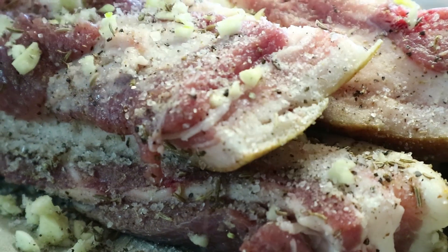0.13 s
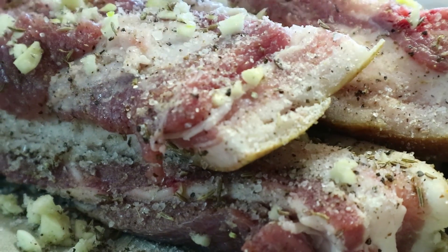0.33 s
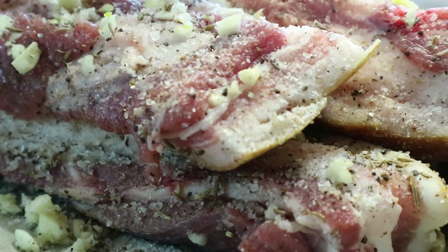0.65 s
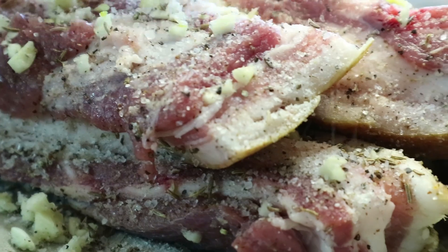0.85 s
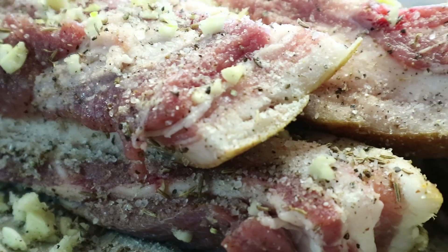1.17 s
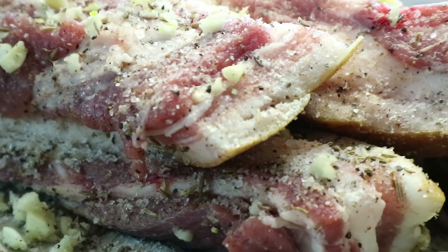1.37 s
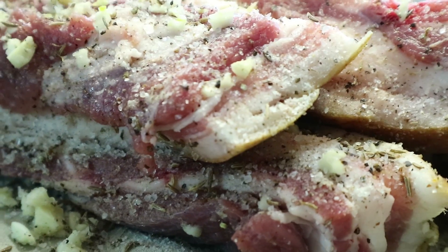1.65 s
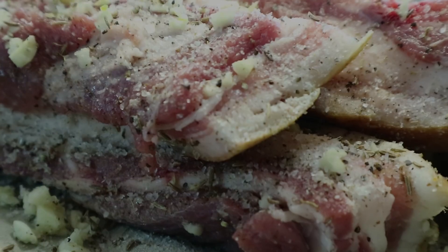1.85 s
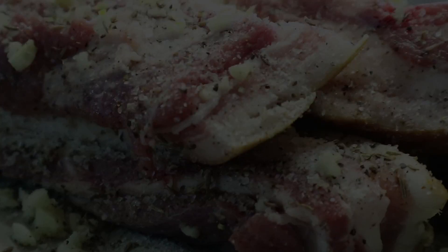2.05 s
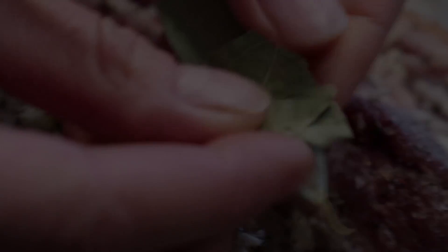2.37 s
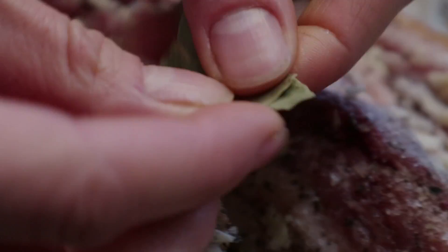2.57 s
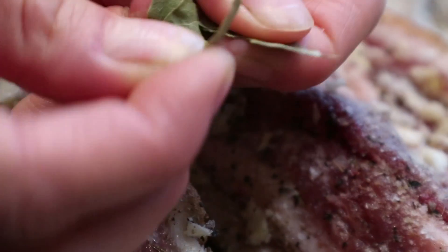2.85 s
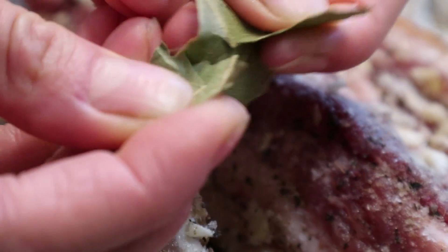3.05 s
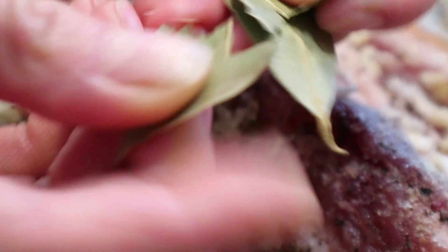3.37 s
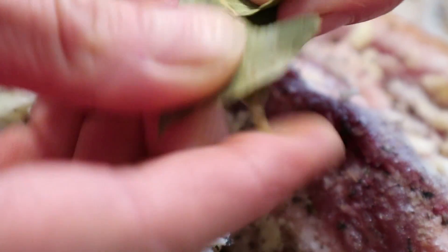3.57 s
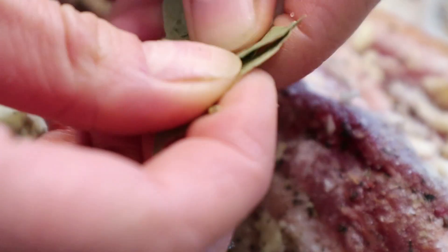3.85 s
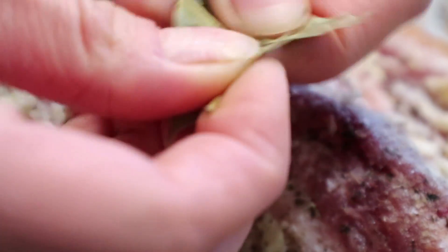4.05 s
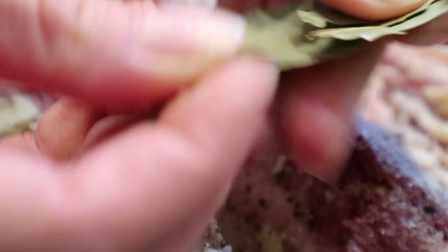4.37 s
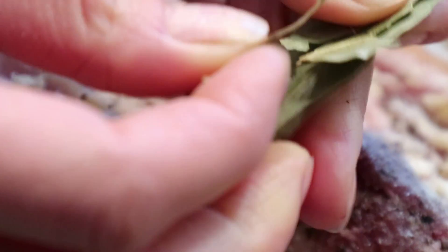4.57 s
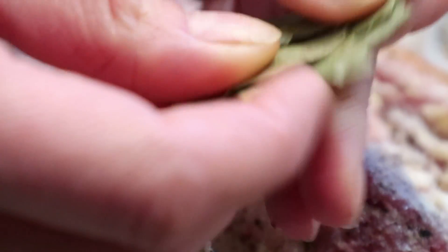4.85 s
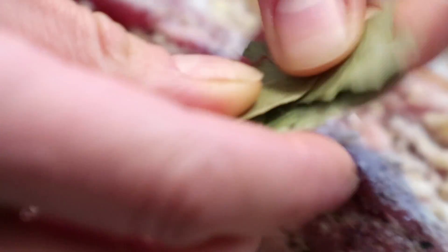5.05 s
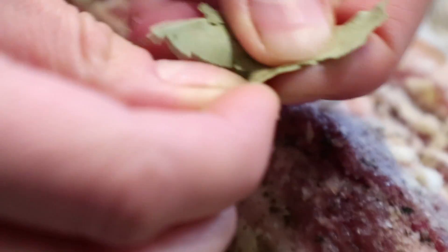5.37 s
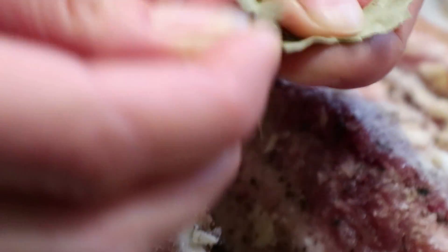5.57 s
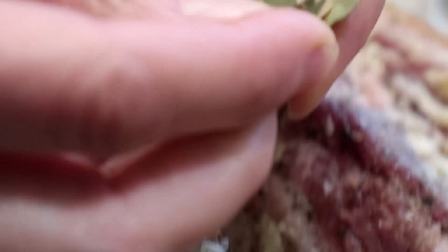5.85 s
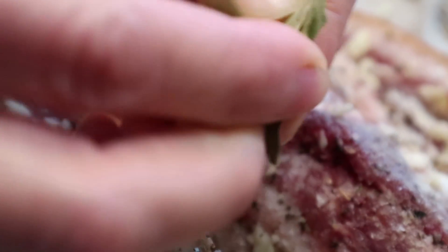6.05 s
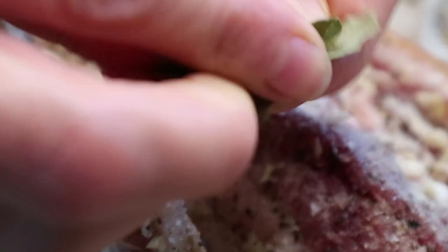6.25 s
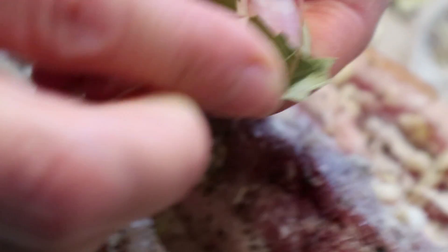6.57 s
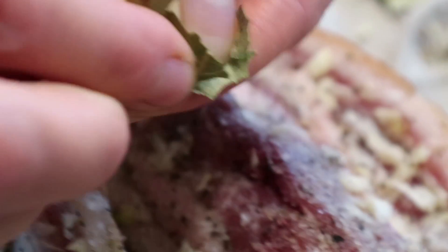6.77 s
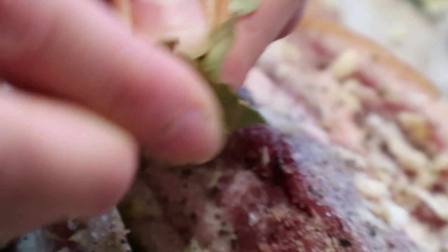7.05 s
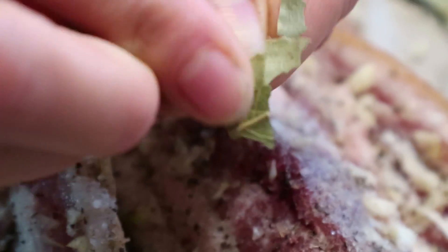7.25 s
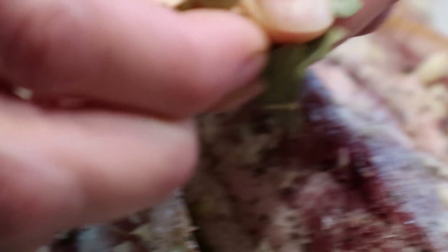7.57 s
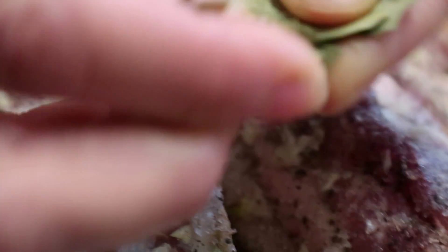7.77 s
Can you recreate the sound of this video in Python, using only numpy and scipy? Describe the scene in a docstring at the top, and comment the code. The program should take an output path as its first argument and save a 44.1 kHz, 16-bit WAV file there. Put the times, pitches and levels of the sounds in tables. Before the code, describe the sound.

A quiet kitchen with soft low room tone. For the first second and a half, faint sandy strokes of seasoning being rubbed or sprinkled. Around two seconds dried leaves begin to rustle and break close to a stereo microphone: sharp woody snaps, brittle crackle and scrapes in irregular clusters, with small gaps, growing denser after five seconds, with few dull finger bumps and a very short room reflection.

```python
"""Dry bay leaves tear close to a stereo microphone in a quiet kitchen: each brittle snap is a noise burst plus a
decaying tone, over a bed of fine crackle made of thousands of tiny ringing grains and noise.
Soft strokes of shaped hiss are fingers rubbing seasoning at first, then one airy rustle among the snaps; skin
rubs are wavering tones and the few dull bumps are short low tones. A brief room answer follows the leaves,
over a wide, low room tone of noise."""
import sys
import numpy as np
from scipy import signal
from scipy.fft import rfft, irfft, next_fast_len
from scipy.io import wavfile
from scipy.ndimage import uniform_filter1d, minimum_filter1d, map_coordinates

SR = 44100
rng = np.random.default_rng(int(sys.argv[2]) if len(sys.argv) > 2 else 0)


def bounce(signal):
    """Save signal as a 16-bit WAV file at the path given by the first command-line argument."""
    frames = np.transpose(np.atleast_2d(signal))
    limited = np.clip(frames, -1, 1)
    pcm = np.round(limited * 32767).astype(np.int16)
    wavfile.write(sys.argv[1], SR, pcm)


N = 349272

# Room tone common to both channels, then opposed between them: frequency_hz, density_db (per Hz, relative)
TONE_MID = [(20, -26), (290, -6), (800, -8), (3500, -14.5), (11000, -32.5), (14000, -60)]
TONE_SIDE = [(25, -87), (117, -7.5), (380, -4.5), (1560, -15), (11000, -38), (14000, -78)]
# Bass stirred by the hands moving close: time_s, level_db, deepest_rumble_db
BUSY = [(2.0, -74.5, -81.5), (4.6, -64, -82), (6.2, -67.5, -74), (6.8, -60.5, -65), (7.92, -62, -72.5)]
# Decay of the kitchen's answer: frequency_hz, t60_s
KITCHEN = [(300, 0.29), (2000, 0.2), (10000, 0.15)]
# Dull bumps of the hands: start_s, opposed_level_db, pitch_hz, common_share (ratio to the opposed part)
BUMPS = [(2.5014, -35, 300, 1), (4.7503, -32.5, 230, 0.37), (4.779, -21.5, 244, 0.31),
         (5.162, -33.5, 300, 0.79), (6.8273, -32, 190, 0.25), (6.8724, -30.5, 260, 0.25),
         (7.2218, -24, 310, 0.44)]
# Soft hissing strokes, rubbed seasoning and last an airy rustle: start_s, length_s, hiss_db (before the sag)
STROKES = [(0.0, 0.19, -68.5), (0.199, 0.088, -63.5), (0.362, 0.4, -62.5), (0.91, 0.24, -63.5),
           (1.131, 0.088, -60), (1.276, 0.35, -63), (4.385, 0.042, -55)]
# Spectrum of the strokes' hiss: frequency_hz, density_db (per Hz, relative)
GRIT = [(700, -22), (2000, 0), (3000, -5), (6200, -2.5), (11000, -11.5), (16000, -31)]
# Soft rubs of skin on leaf: start_s, length_s, middle_pitch_hz, level_db
RUBS = [(7.138, 0.04, 1145, -58), (7.642, 0.036, 1130, -52), (7.031, 0.069, 1390, -53),
        (7.336, 0.062, 1130, -52), (7.376, 0.038, 280, -50), (7.431, 0.026, 1164, -44.5)]
# Scrapes of leaf on leaf, swelling until they slip: peak_s, swell_s, level_below_5khz_db, treble_db
SCRAPES = [(1.992, 0.068, -48.5, -57.5), (2.065, 0.051, -44.5, -48), (2.706, 0.097, -37, -50.5),
           (2.856, 0.074, -54, -31.5), (3.15, 0.19, -41, -47), (3.717, 0.035, -45, -66),
           (3.937, 0.12, -45.5, -69), (4.284, 0.079, -36.5, -54), (5.10, 0.021, -46, -50.5),
           (5.3, 0.017, -43, -40), (5.691, 0.028, -42, -44), (6.123, 0.15, -46.5, -38),
           (6.61, 0.049, -49, -62), (6.849, 0.47, -47, -42.5), (7.322, 0.059, -52, -42.5)]
# Rising and falling rustle under the snaps: time_s, level_below_5khz_db, treble_db
RUSTLE = [(2.0, -60, -86), (2.4, -51.5, -61), (2.75, -56, -80), (3.1, -68.5, -69), (3.36, -62, -81),
          (3.6, -70, -71), (3.8, -49, -61.5), (4.2, -62.5, -83), (4.55, -61, -108), (4.85, -59, -63.5),
          (5.15, -49.5, -74), (5.335, -51, -66), (5.44, -48, -53), (5.87, -50.5, -55.5), (6.19, -59, -59),
          (6.5, -51, -51), (6.95, -57, -68), (7.2, -50, -45.5), (7.36, -60, -85), (7.55, -55, -47.5),
          (7.69, -61, -65.5), (7.92, -47.5, -50)]
# Spectrum of the leaf rustle: frequency_hz, density_db (per Hz, relative)
LEAF = [(300, -3.5), (1200, -2), (2100, 0.5), (5000, -7.5), (12000, -23.5), (16500, -39)]
# Snaps of the leaf blade, plus one low knock of the hands at 2.503 s built the same way: start_s,
# flap_pitch_hz, flap_db, crack_db (levels before the filters)
SNAPS = [(2.111, 3120, -27, -32), (2.1183, 1970, -22.5, -29), (2.1395, 1460, -16.5, -23),
         (2.197, 780, -18, -37), (2.265, 1480, -26.5, -33), (2.3276, 1890, -21.5, -27),
         (2.503, 656, -9, -40), (2.502, 2220, -2.5, -10.5), (2.766, 2100, -20.5, -18),
         (2.7792, 3200, -42, -42), (2.7969, 2220, 0.5, 1), (2.8115, 1860, -18, -18.5),
         (2.8194, 1970, -8.5, -16), (2.837, 2080, -26, -17), (2.8453, 2100, -13, -20),
         (2.866, 1820, -17, -19.5), (2.8853, 2540, -26, -25), (2.942, 2300, -47, -23),
         (2.947, 2250, -17, -17.5), (2.9564, 2370, -52, -18.5), (2.9896, 1820, -48, -29),
         (3.0463, 1700, -5.5, -10.5), (3.0549, 1650, -3.5, -11.5), (3.18, 1560, -14, -28),
         (3.1861, 1600, -12, -17), (3.2524, 1750, -9.5, -13.5), (3.2614, 894, -11.5, -13.5),
         (3.2835, 2100, -15.5, -23), (3.4592, 1050, -34, -42.5), (3.655, 2040, -30.5, -36.5),
         (3.662, 1030, -24.5, -62), (3.737, 810, -21, -38), (3.754, 1450, -17.5, -24),
         (4.028, 2020, -13, -25), (4.0336, 1950, -14, -15), (4.053, 1750, -19, -27),
         (4.117, 1970, -22, -38), (4.13, 1990, -28, -20.5), (4.1454, 1600, -23, -15),
         (4.168, 2070, -16.5, -27), (4.2437, 1780, -21, -21), (4.2687, 1540, -20.5, -47),
         (4.282, 990, -18, -21.5), (4.59, 1640, -17.5, -32), (4.6042, 2270, -19.5, -32),
         (4.699, 2770, -24.5, -36.5), (4.93, 2040, -25.5, -28), (4.999, 2270, -26, -38),
         (5.034, 2340, -25.5, -35.5), (5.266, 2640, -21, -24), (5.278, 1890, -15.5, -11.5),
         (5.347, 2120, -12.5, -7.5), (5.362, 2060, -20, -14.5), (5.383, 2430, -32, -14.5),
         (5.391, 2400, -21, -19), (5.4014, 1810, -5, -21), (5.4134, 1470, -7, -8),
         (5.4257, 1540, -14, -9.5), (5.4344, 1920, -9.5, -13), (5.4884, 1900, -16, -19),
         (5.532, 1930, -14, -8), (5.544, 1940, -20, -15), (5.5748, 1610, -17, -17.5),
         (5.643, 3040, -29, -24), (5.6565, 2350, -24, -23.5), (5.7321, 970, -17, -21),
         (5.7418, 750, -8.5, -22), (5.758, 2410, -13.5, -46), (5.8105, 2110, -16.5, -31),
         (5.818, 2400, -23.5, -21), (5.8869, 2920, -27, -21), (5.912, 2580, -17.5, -27),
         (5.9211, 1850, -15, -13.5), (5.9515, 2500, -31, -27.5), (5.9919, 1700, -47, -26.5),
         (6.0158, 2500, -49, -13), (6.0683, 1780, -16, -15.5), (6.083, 1390, -16.5, -23),
         (6.098, 2870, -26, -17), (6.1045, 2900, -36, -22), (6.224, 2440, -25.5, -21.5),
         (6.3146, 2550, -41, -16), (6.3311, 2570, -8.5, -11), (6.372, 2420, -16.5, -12),
         (6.5216, 1980, -14.5, -35), (6.5386, 2440, -14, -29), (6.5698, 2430, -16.5, -40),
         (6.5956, 1650, -19, -22), (6.7035, 2850, -34, -38), (6.7552, 2730, -27, -30),
         (6.7677, 2510, -14, -22.5), (6.781, 3600, -27, -38), (6.792, 3020, -20, -25),
         (6.8146, 2130, -21.5, -19), (6.8216, 3010, -18, -26), (6.829, 3130, -24, -30),
         (6.904, 1860, -25, -64), (7.0557, 2350, -20, -27), (7.078, 1100, -28, -13.5),
         (7.1667, 3670, -42, -33), (7.176, 2000, -20.5, -13.5), (7.199, 2120, -31, -21.5),
         (7.2602, 2860, -46, -30), (7.2651, 2740, -48, -19.5), (7.284, 1950, -23.5, -31),
         (7.2923, 2680, -47, -29), (7.3937, 2370, -28, -26), (7.4353, 2530, -13, -23),
         (7.4678, 710, -24, -49), (7.495, 2210, -26, -25.5), (7.502, 2700, -31, -26),
         (7.512, 2360, -27, -30), (7.5294, 2380, -34, -24), (7.5676, 3060, -38, -18.5),
         (7.5754, 2350, -16, -16), (7.584, 2530, -27, -21.5), (7.646, 2110, -28, -28),
         (7.6945, 2500, -38, -44), (7.737, 2410, -34, -34), (7.805, 2020, -16.5, -16.5),
         (7.8536, 1680, -21, -23.5), (7.907, 2200, -19.5, -45)]
# Colour of a crack: frequency_hz, gain_db
CRACK = [(2000, -9.5), (4000, 7), (10000, -2.5), (13000, -8), (16000, -24)]
# Side level relative to mid for the leaves: frequency_hz, gain_db
WIDTH = [(300, -5.5), (2500, -4.5), (6000, -1), (14000, -0.5)]

BUMP_CYCLES = 3.5  # cycles to fall 60 dB
STROKE_RISE_S, STROKE_FALL_S, STROKE_SAG_DB_PER_S = 0.035, 0.064, 11.5
RUB_SAG, RUB_FUZZ = 0.16, 0.127  # share of pitch lost over a rub; rms random wander as a share of pitch
SWELL_DB, SLIP_T60_S = 21.5, 0.048  # rise over the swell time; onset and fall after the slip

# A break keeps crackling: the flap feeds the lower rustle, the crack the treble
AFTER_DB, AFTER_TREBLE_DB = -32, -29.5  # rustle offset, before growth with the break's level
AFTER_GROWS = 0.74  # dB of rustle per dB of the break
AFTER_TOP_DB = -13  # louder breaks stir no more rustle than one of this level
AFTER_T60_S = 0.13
LEAD_IN_T60_S, LEAD_IN_DB = 0.021, 6  # the rustle rises briefly before each snap

# The whole blade hums under the rustle; the hum fades out over the second before TORN_S
BLADE_HZ, BLADE_WIDTH_HZ, BLADE_DB, TORN_S = 1890, 910, -5, 5.74
DULL_DB = 0.8  # dB per octave of crack treble lost per dB by which the flap outweighs the crack
# The piece's next mode: ratio to flap pitch, level relative to the crack, cycles to fall 60 dB
OVERTONE, OVERTONE_DB, OVERTONE_CYCLES = 2.117, -10.5, 27
TOP_HZ = 16800  # upper band limit


def amp(db):
    """Gain of a level in dB."""
    return 10 ** (np.asarray(db) / 20)


def unit(x):
    """x at rms 1."""
    return x / np.sqrt(np.mean(x ** 2) + 1e-20)


def along(points, hz):
    """Values of (Hz, value) points interpolated on a log axis."""
    f, v = np.transpose(points)
    return np.interp(np.log(hz + 1), np.log(f + 1), v)


def curves(rows):
    """One value per sample for each column after the time; very low outside the table."""
    s, *cols = np.transpose(rows)
    return [np.interp(np.arange(N) / SR, s, c, left=-120, right=-120) for c in cols]


def wobble(rate):
    """A smooth random curve, rate knots a second."""
    knots = rng.standard_normal(int(N * rate / SR) + 4)
    return map_coordinates(knots, [np.arange(N) * rate / SR])


def filtered(x, response):
    """x times a response of frequency."""
    m = next_fast_len(N + 8192)
    return irfft(rfft(x, m) * response(np.fft.rfftfreq(m, 1 / SR)), m)[..., :N]


def coloured(x, spectrum):
    """x shaped by (Hz, dB) points."""
    return filtered(x, lambda hz: amp(along(spectrum, hz)))


def placed(seconds, shapes):
    """Rows of short waveforms summed at their times."""
    at = np.round(np.asarray(seconds) * SR).astype(int)[:, None] + np.arange(shapes.shape[1])
    return np.bincount(at.ravel(), shapes.ravel(), N + SR)[:N]


def spread(mid, side):
    """Left and right from the shared and the opposed part."""
    return np.array([mid + side, mid - side])


def widened(pair):
    """Two versions of a leaf sound become mid and side; the channels differ most in the treble."""
    return spread(pair[0], coloured(pair[1], WIDTH))


def room_tone():
    """Steady kitchen air as shaped noise; its bass stirs more once the hands move close."""
    mid, side = rng.standard_normal((2, N))
    air_mid = amp(-65.5) * unit(coloured(mid, TONE_MID))
    air_side = amp(-59) * unit(coloured(side, TONE_SIDE))
    stir = unit(coloured(rng.standard_normal((2, N)), [(110, -5.5), (250, 8.5), (800, 2.5), (2000, -30)]))
    rumble = unit(coloured(rng.standard_normal((2, N)), [(40, -36), (90, 3.5), (200, -19)]))
    busy_db, deep_db = curves(BUSY)
    stirred = amp(busy_db + 2.5 * wobble(18)) * spread(stir[0], 1.67 * stir[1])
    deep = amp(deep_db + 2.2 * wobble(26)) * spread(*rumble)
    return spread(air_mid, air_side) + stirred + deep


def kitchen(x):
    """The room's answer, each frequency dying at its own speed; a new tail every third of a second."""
    out = np.zeros((2, N + SR))
    step = SR // 3
    delay = 150  # samples before the answer begins
    for a in range(0, N, step):
        hz, t, z = signal.stft(rng.standard_normal((2, SR // 4)), SR, nperseg=256)
        decay = amp(-60 * t / along(KITCHEN, hz)[:, None])
        tail = signal.istft(z * decay, SR, nperseg=256)[1]
        wet = signal.fftconvolve(x[None, a:a + step], tail / np.linalg.norm(tail[0]), axes=1)
        out[:, a + delay:a + delay + wet.shape[1]] += wet
    return out[:, :N]


def bumps():
    """Soft low knocks, damped within a few cycles, mostly opposed between the channels."""
    s, level_db, push_hz, shared = (c[:, None] for c in np.transpose(BUMPS))
    turns = np.arange(SR // 20) / SR * push_hz
    push = amp(level_db - 60 * turns / BUMP_CYCLES) * np.sin(2 * np.pi * turns)
    pair = spread(placed(s[:, 0], -shared * push), placed(s[:, 0], push))
    return filtered(pair, lambda hz: hz ** 2 / (hz ** 2 + 45 ** 2))


def strokes():
    """Rubbed seasoning, then one airy rustle: soft shaped hiss that rises, sags, stops and flutters a little."""
    hiss = unit(coloured(rng.standard_normal((2, N)), GRIT))
    flutter_db = 1.2 * wobble(40)
    s, length, hiss_db = (c[:, None] for c in np.transpose(STROKES))
    t = np.arange(N) / SR - s
    rise = 0.011 + t / STROKE_RISE_S
    fall = 1 + (length - t) / STROKE_FALL_S
    edges = np.clip(np.minimum(rise, fall), 0, 1)
    level = (edges * amp(hiss_db - STROKE_SAG_DB_PER_S * np.clip(t, 0, 1))).sum(axis=0)
    return level * amp(flutter_db) * spread(hiss[0], 0.65 * hiss[1])


def rubs():
    """A fingertip sticks and slips along the blade at a wavering, sagging rate, heard as a short fuzzy note."""
    s, length, rub_hz, rub_db = (c[:, None] for c in np.transpose(RUBS))
    t = np.arange(SR // 10) / SR
    u = np.clip(t / length, 0, 1)  # progress through the rub
    wander = unit(uniform_filter1d(rng.standard_normal((len(s), len(t))), size=150, axis=1))
    pitch_hz = rub_hz * (1 + RUB_SAG * (.5 - u) + RUB_FUZZ * wander)
    phase = 2 * np.pi * np.cumsum(pitch_hz, axis=1) / SR
    note = placed(s[:, 0], amp(rub_db) * np.sin(np.pi * u) * np.sin(phase))
    return spread(note, .5 * note)


def scrapes():
    """Power of leaf scrapes that swell until they slip, under 5 kHz and in the treble."""
    s, swell, body_db, treble_db = (c[:, None] for c in np.transpose(SCRAPES))
    t = np.arange(N) / SR - s
    swell_db = SWELL_DB * t / swell + 60 * np.minimum(t + swell, 0) / SLIP_T60_S
    power = amp(np.where(t < 0, swell_db, -60 * t / SLIP_T60_S)) ** 2
    return (amp(body_db) ** 2 * power).sum(axis=0), (amp(treble_db) ** 2 * power).sum(axis=0)


def aftermath(break_db, gain_db):
    """Power of the rustle that rises briefly before each snap and dies after it."""
    t = np.arange(-SR // 2, SR // 2 + 1) / SR
    shape_db = np.where(t < 0, LEAD_IN_DB + 60 * t / LEAD_IN_T60_S, -60 * t / AFTER_T60_S)
    kick_db = gain_db + AFTER_GROWS * np.minimum(break_db, AFTER_TOP_DB)
    kicks = placed(np.transpose(SNAPS)[0], amp(kick_db)[:, None] ** 2)
    return np.abs(signal.fftconvolve(kicks, amp(shape_db) ** 2, mode="same"))


def crackle_bed():
    """Tiny ringing breaks and bright pinpoint fractures come in clumps on a noise rustle."""
    count, first_s = 6000, 1.9
    luck = rng.random((count, 4))
    s = first_s + luck[:, 0] * (N / SR - first_s)
    hz = 1300 * np.exp(1.745 * luck[:, 1:2] ** 1.09)  # grains gather near the blade's low resonance
    size = amp(-3 * np.log(luck[:, 2:3] + .03))  # many small, few large
    t = np.arange(SR // 150) / SR
    grain = size * amp(-60 * t * hz / 11) * (1 - np.exp(-t * hz)) * np.sin(2 * np.pi * hz * t)
    clump = amp(2.04 * wobble(40) + 3.1 * wobble(110))
    # one grain in nine also lets go a brief flash of the rustle's whole spectrum
    clump = clump * (1 + .4 * placed(s[::9], size[::9] * amp(-60 * t / .007)))
    fracture = size[::2] * amp(-60 * t / .0015) * rng.standard_normal((len(s[::2]), len(t)))
    bed = []
    for lean in [np.ones((count, 1)), 2 * luck[:, 3:4] - 1]:  # mid, then side
        ringing = unit(placed(s, grain * lean))
        spikes = unit(coloured(placed(s[::2], fracture * lean[::2]), CRACK))
        rustle = unit(coloured(rng.standard_normal(N), LEAF))
        bed.append(unit(clump * (ringing + spikes + 1.73 * rustle)))
    # the colour shifts in smooth random patches of time and frequency
    z = signal.stft(widened(bed), nperseg=512)[2]
    patches = uniform_filter1d(uniform_filter1d(rng.standard_normal(z.shape[1:]), 12, 0), 8, 1)
    return signal.istft(z * amp(2.5 * unit(patches)), nperseg=512)[1][:, :N]


def crackle():
    """The bed follows the rustle, scrapes and snaps in two bands; a whole blade's resonance hums in the lower."""
    rustle_db, rustle_treble_db = curves(RUSTLE)
    _, _, flap_db, crack_db = np.transpose(SNAPS)
    bed = crackle_bed()
    treble = filtered(bed, lambda hz: 1 / (1 + (5000 / (hz + 1)) ** 4))
    low = unit(bed - treble)
    scrape, scrape_treble = scrapes()
    # the parts add in power
    body = np.sqrt(amp(rustle_db) ** 2 + scrape + aftermath(flap_db, AFTER_DB))
    fizz = np.sqrt(amp(rustle_treble_db) ** 2 + scrape_treble + aftermath(crack_db, AFTER_TREBLE_DB))

    def resonance(hz):
        """The blade's broad peak over a flat response."""
        return 1 + amp(BLADE_DB) / (1 + (2 * (hz - BLADE_HZ) / BLADE_WIDTH_HZ) ** 4)

    hum = unit(filtered(low, resonance))
    whole = np.clip(TORN_S - np.arange(N) / SR, 0, 1)
    return body * (whole * hum + (1 - whole) * low) + fizz * unit(treble)


def snaps():
    """Each break is a burst of treble in a colour of its own plus the freed piece flapping and ringing."""
    s, flap_hz, flap_db, crack_db = (c[:, None] for c in np.transpose(SNAPS))
    t = np.arange(SR // 50) / SR
    cycle_luck, lean_luck, colour_luck = rng.standard_normal((3, len(s), 1))
    noise = rng.standard_normal((2, len(s), len(t)))
    # cycles to fall 60 dB; big pieces are damped by the fingers
    cycles = 8 * np.sqrt(flap_hz / 2000) * np.exp(.2 * cycle_luck)
    rise = 1 - np.exp(-t * flap_hz / 0.49)  # the piece swings up over its first cycle
    flap = amp(flap_db - 60 * t * flap_hz / cycles) * rise * np.sin(2 * np.pi * flap_hz * t)
    ring_hz = OVERTONE * flap_hz
    ring_db = crack_db + OVERTONE_DB - 60 * t * ring_hz / OVERTONE_CYCLES
    ring = amp(ring_db) * np.sin(2 * np.pi * ring_hz * t)
    # a sharp front, then fibres keep parting for a few milliseconds
    shape = (amp(-60 * t / 0.002) + amp(-9.5 - 60 * t / 0.011)) * (1 - np.exp(-t / 0.00005))
    hz = np.fft.rfftfreq(len(t), 1 / SR)
    dulling = DULL_DB * np.clip(flap_db - crack_db, -10, 20)
    colour_db = along(CRACK, hz) - dulling * np.log2(1 + hz / 2000)
    colour_db = colour_db + 5 * np.cos(hz / 260 + 3 * colour_luck)  # every fragment rings in its own bands
    out = []
    for k, lean in enumerate([1, .35 * lean_luck]):  # mid, then side: a snap off centre feeds the side
        burst = shape * irfft(rfft(noise[k]) * amp(colour_db), len(t))
        burst = amp(crack_db - 3.0 * k) * burst / np.abs(burst).max(axis=1, keepdims=True)
        out.append(placed(s[:, 0], lean * (flap + ring) + burst))
    return widened(out)


def scene():
    """Leaves, hands and room together; small leaf pieces radiate hardly any bass."""
    leaves = filtered(snaps() + crackle(), lambda hz: 1 / (1 + (450 / (hz + 1)) ** 4))
    echoes = amp(-11) * kitchen(leaves.mean(axis=0))
    return room_tone() + echoes + bumps() + strokes() + rubs() + leaves


def record(dry):
    """Brief shared gain dips limit peaks on either channel; nothing passes above the band limit."""
    needed = np.minimum(1, .93 / np.abs(dry).max(axis=0))
    dry = dry * uniform_filter1d(minimum_filter1d(needed, size=180), size=90)
    return filtered(dry, lambda hz: np.clip((TOP_HZ - hz) / 600, 0, 1) ** 2)


dry = scene()
out = record(dry)
bounce(out)
```